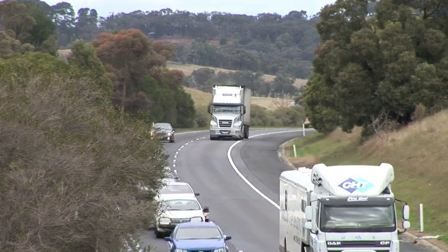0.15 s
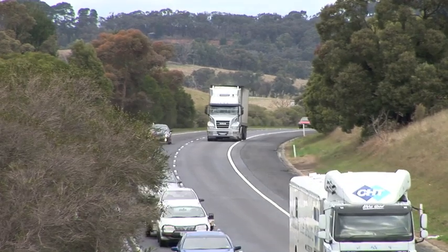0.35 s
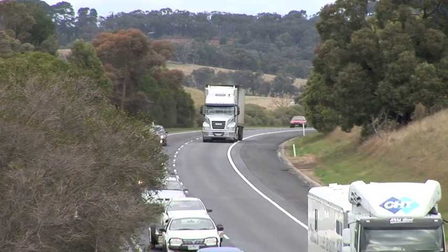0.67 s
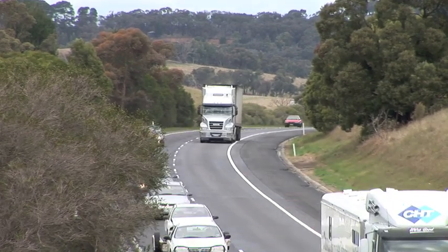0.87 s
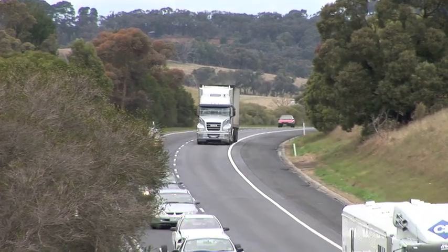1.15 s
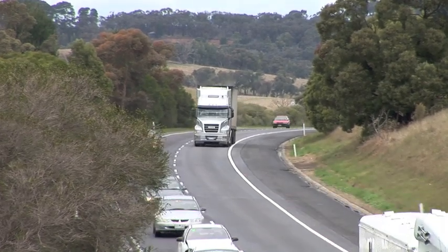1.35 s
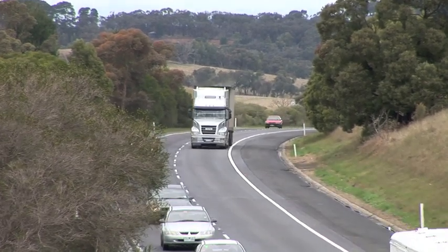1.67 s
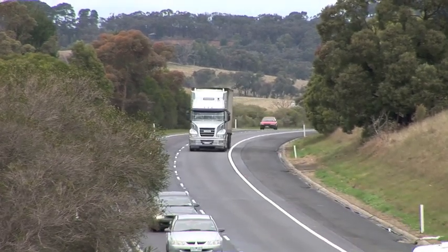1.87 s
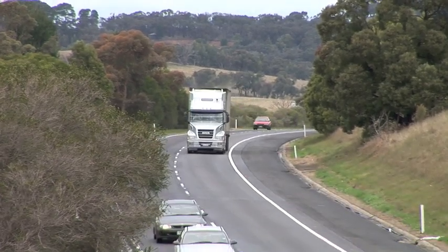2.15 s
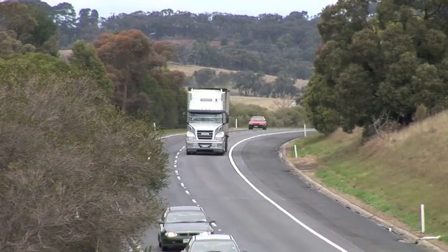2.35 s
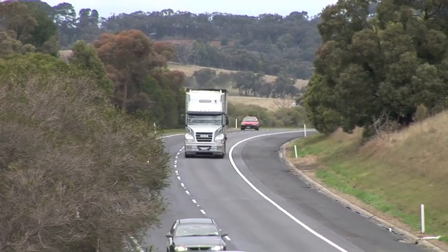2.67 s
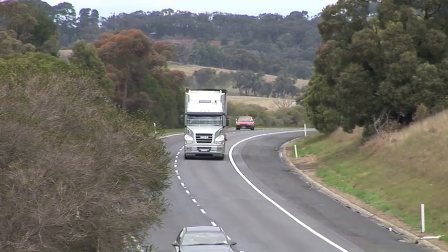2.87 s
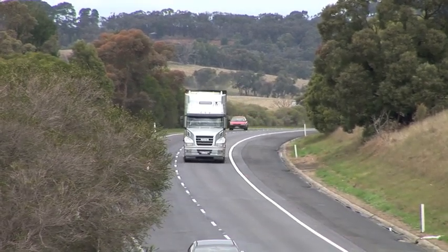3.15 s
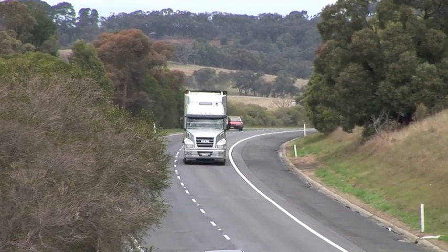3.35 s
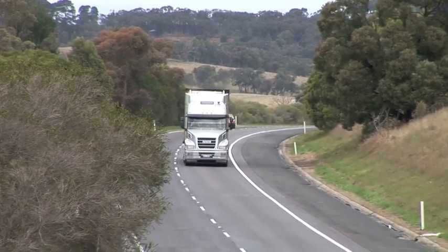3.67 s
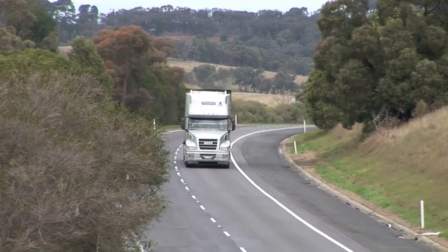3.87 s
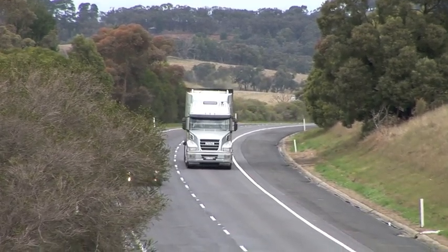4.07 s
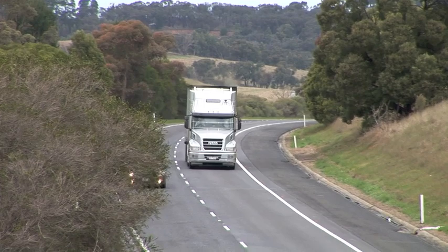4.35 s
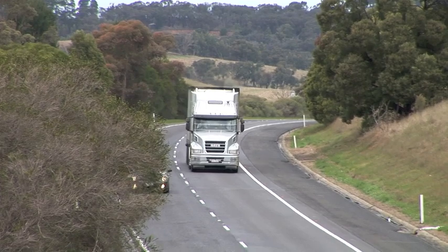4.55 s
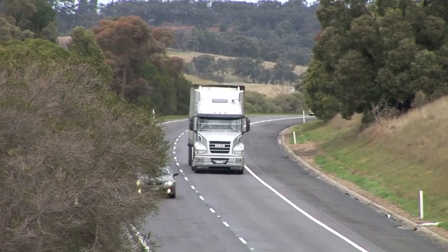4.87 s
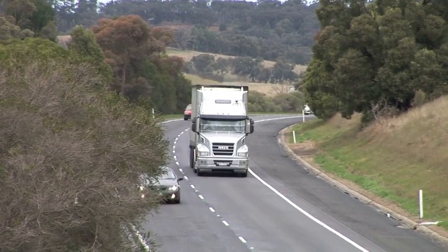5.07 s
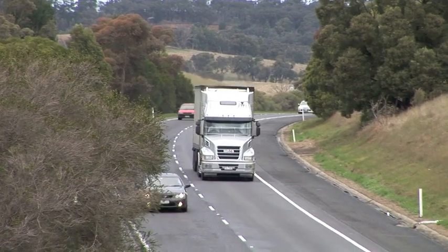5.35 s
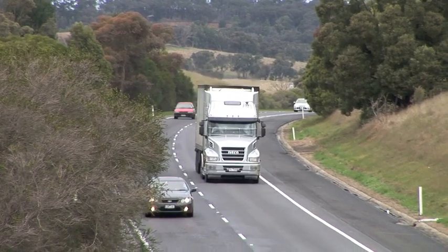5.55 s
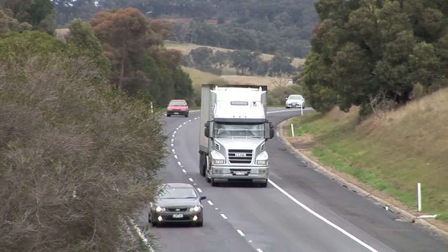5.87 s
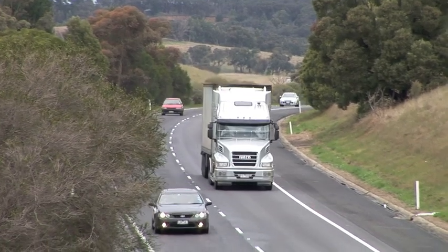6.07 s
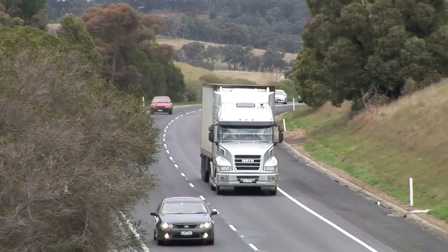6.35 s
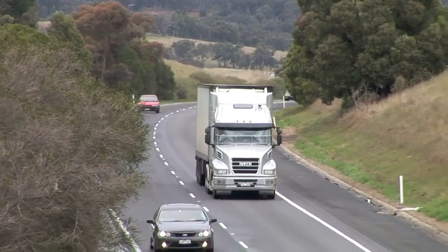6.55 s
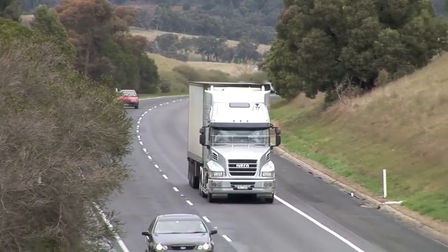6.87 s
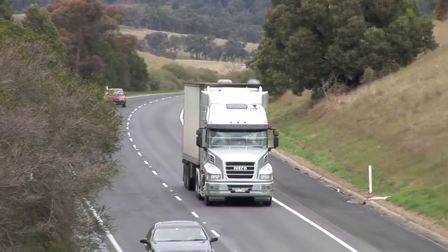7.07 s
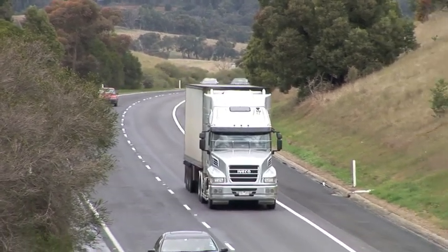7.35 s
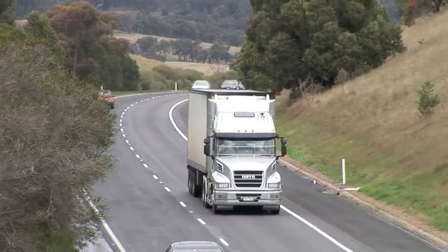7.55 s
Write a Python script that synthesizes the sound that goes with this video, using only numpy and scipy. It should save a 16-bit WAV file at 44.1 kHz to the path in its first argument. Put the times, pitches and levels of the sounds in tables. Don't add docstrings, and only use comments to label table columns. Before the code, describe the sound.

Continuous broadband tyre roar over faint distant traffic on an open country road. An early vehicle passes with a brief hollow bump, then a quieter stretch carries thin singing treads and a distant steady diesel. From four seconds everything swells: engines growl, tyres hiss brightly, and a truck drone surges and drops. Several passes overlap to the end, leaning right in a slightly compressed, hissy stereo pickup from a small camera.

```python
import sys
import numpy as np
from scipy import signal
from scipy.fft import rfft, irfft, next_fast_len
from scipy.io import wavfile
from scipy.ndimage import uniform_filter1d

SR = 44100
rng = np.random.default_rng(int(sys.argv[2]) if len(sys.argv) > 2 else 0)


def volts_from_decibels(level):
    exponent = np.asarray(level, float) / 20
    return 10 ** exponent


def digitize_waveform(pressure):
    field = np.atleast_2d(pressure).T
    bounded = np.clip(field, -1, 1)
    quanta = np.round(bounded * 32767).astype(np.int16)
    wavfile.write(sys.argv[1], SR, quanta)


N = 339481

# frequency in Hz, level in dB.
WHINE_LINES = [(6298, -98), (6600, -96), (6901, -97), (7348, -100), (7499, -102), (7650, -97), (7800, -104),
               (7951, -100), (8102, -102), (9152, -101), (10201, -102), (10352, -104), (10648, -102),
               (11251, -104)]
# start in seconds, level in dB.
JOLTS = [
    (1.5, -40),
    (1.567, -35.5),
    (1.65, -42),
]
# draws level in seconds, passage (lane distance / speed) in seconds,
# tyre level in dB, body level in dB, tread-groove level in dB.
VEHICLES = [
    (1.67, 0.76, -35, -33.5, -33.5),
    (2.51, 0.63, -57, -51.5, -51.5),
    (3.3, 0.097, -48, -47, -39.5),
    (4.93, .68, -30, -30, -25.5),
    (5.47, 0.55, -31, -32.5, -49),
    (5.93, 0.49, -32.5, -34, -30.5),
    (6.74, 0.52, -33, -35, -33),
    (7.42, 0.68, -33.5, -35.5, -30.5),
]
TYRE, BODY, GROOVE = 2, 3, 4

# frequency in Hz, density in dB per Hz.
WAKE_COLOUR = [(12, -42.5), (22, -19), (48, -6.5), (65, -3), (95, 0), (125, -3.5), (160, -44)]
# draws level in seconds, passage in seconds, firing rate in Hz, speed in m/s, level in dB.
CARS = [
    (1.8, .25, 55, 22, -45),
    (1.95, 0.16, 82, 4.4, -45.5),
    (5.1, .45, 75.6, 24, -35),
    (5.0, .8, 67, 28, -44),
]
# time in seconds, firing rate in Hz, level in dB, second-order level in dB.
DIESEL = [(.3, 112, -49, -70), (.7, 112, -52, -81), (1.5, 111, -47.5, -68), (2.0, 111.5, -51, -71),
          (2.3, 112.8, -44, -68), (2.9, 112, -45, -65.5), (4.0, 112.1, -37, -57),
          (5.05, 111.9, -30.5, -52.5), (5.29, 110.5, -23, -60), (5.48, 109.7, -26.5, -44),
          (5.7, 107, -26, -48), (5.9, 100.6, -29, -55), (6.1, 101.3, -26.5, -41.5), (6.29, 100, -33.5, -53),
          (6.52, 95.8, -41, -65), (7.0, 94.9, -42.5, -59), (7.22, 95.7, -37.5, -64.5), (7.65, 94, -48, -65)]
# time in seconds, firing rate in Hz, level in dB.
SECOND_DIESEL = [(4.55, 115.5, -48), (4.8, 115.5, -46), (5.15, 115.1, -45), (5.45, 113.2, -47),
                 (5.72, 110.6, -42), (6.05, 108.3, -51), (6.2, 108.1, -42), (6.42, 108.6, -48),
                 (7.0, 107.5, -50)]
# time in seconds, depth in dB, half length in seconds.
CANCELS = [
    (5.173, 1.5, .06),
    (5.817, 11, 0.068),
    (6.077, 14, 0.044),
    (6.207, 21, 0.063),
    (6.412, 17, 0.086),
    (6.703, 7, 0.13),
    (7.35, 8.5, 0.096),
]
# time in seconds, order, lift in dB, half length in seconds.
FLARES = [
    (4.8, 2, 10, .15),
    (5.123, 2, 18.5, 0.24),
    (5.36, 2, 18, .22),
    (5.254, 3, 15, 0.43),
    (5.74, 3, 13, .16),
    (6.417, 2, 18.5, 0.12),
]

# low edge in Hz, high edge in Hz.
ROAR_BANDS = [(1450, 3200), (130, 320), (380, 700), (750, 980)]
# frequency in Hz, density in dB per Hz.
ROAR_COLOUR = [(120, -6), (229, -11.5), (332, -11.5), (452, -12.5), (644, -12), (800, -9.5), (980, -9),
               (1060, -22), (1300, -17.5), (1450, -12.5), (2130, -12.5), (2850, -17.5), (3300, -24),
               (3700, -43.5)]
GROOVE_COLOUR = [(930, -19), (1020, 1), (1100, 2), (1250, 0.5), (1350, -2.5), (1480, -23.5)]
GRIT_COLOUR = [(3000, -25.5), (3350, -1), (4000, -4.5), (4500, -15), (4950, -9), (5300, -17), (5750, -19.5),
               (6200, -24), (7000, -29.5), (8000, -38), (8600, -27), (9350, -34.5), (10300, -33),
               (15200, -37)]
# time in seconds, frequency in Hz, level in dB.
TREAD_LOW = [(2.5, 555, -66), (2.9, 554, -55), (3.3, 553, -52), (3.95, 552, -51), (4.15, 551, -60),
             (4.5, 548, -55), (4.9, 543, -58)]
TREAD_HIGH = [(2.3, 1113, -60), (2.65, 1112, -47.5), (3.1, 1110, -48), (3.6, 1106, -48), (4.2, 1098, -46),
              (4.7, 1087, -43), (5.1, 1075, -52)]
GEAR = [(2.5, 380, -63), (3.4, 380, -59), (4.0, 378, -49.5), (4.3, 377, -64), (4.6, 375, -43.5),
        (4.9, 370, -56)]
EARLY_TREAD = [(0, 803, -52), (.8, 803, -50), (1.1, 812, -52), (1.3, 822, -56)]

# frequency in Hz, gain in dB, phase in radians.
CAPSULE = [(172, -53.7, -0.38), (258, -28.5, -0.82), (344, -17.0, -1.04), (516, -8.8, -1.52),
           (689, -6.5, -1.89), (947, -7.3, -2.18), (1205, -8.0, -2.52), (1464, -8.0, -2.81),
           (1808, -11.0, -3.28), (2153, -15.5, -3.24), (2670, -22.1, -2.49), (3445, -22.4, -1.28),
           (4306, -7.4, -1.22), (4823, -13.9, -1.88)]
# frequency in Hz, density in dB per Hz.
SCATTER_COLOUR = [(76, -70), (130, -23), (192, -12.5), (325, -14), (525, -12.5), (585, -12), (786, -5.5),
                  (1070, -3.5), (1680, -7.5), (3230, -26.5), (4010, -25), (5060, -31.5), (5300, -40.5),
                  (6890, -60), (11700, -120)]
SCATTER_HISS_COLOUR = [(3120, -34), (5300, -4), (5610, 0), (6020, -1), (6430, -4), (7310, -17), (9040, -15),
                       (10700, -22), (13600, -19), (14400, -22), (15200, -29)]
BAND_STARTS = np.r_[0:40:4, 40:96:8, 96:144:12, 144, 160, 176, 196, 216, 240, 264, 292, 320:1025:32]

# level against vehicle in dB, fall as power of nearness,
# share heard from all round (0-1), far-traffic level in dB.
HISS, BOOM = (0.2, 2, 0.2855, -45), (-10.5, 1.24, .78, -57.5)
DIP, TREAD = (-12, 1.5, 0.48, -66.5), (-3.5, 2, 0.3955, -51)
SIZZLE, RING = (-15.5, 1.8, 0.2457, -62.5), (-5.5, 1.5, 0.48, -49)
PUSH, SPRAY = (-18, 4.5, 0.78, -59), (-34.5, 4.6, .5, -89)
FILL, THUMP = (-8.5, 8.5, 0.73, -91.5), (-12, 4.5, 0.45, -90)
SCATTER_ROAR, SCATTER_HISS = (-7.5, 3, 0.77, -51), (-22, 3.5, 0.51, -75.5)


def walk(rate_hz):
    hold = int(SR / rate_hz)
    steps = np.repeat(rng.standard_normal(N // hold + 1), hold)
    return 1.284 * uniform_filter1d(uniform_filter1d(steps, hold), hold)[:N]


def columns(table):
    time_s, *rest = np.transpose(table)
    return [np.interp(np.arange(N) / SR, time_s, values) for values in rest]


def on_log(hz, table, column=1):
    table = np.array(table)
    return np.interp(np.log(hz), np.log(table[:, 0]), table[:, column])


def spectrum_axis():
    size = next_fast_len(N)
    return size, np.arange(1, size // 2 + 2) * SR / size


def both(a_db, b_db):
    return 10 * np.log10(volts_from_decibels(a_db) ** 2 + volts_from_decibels(b_db) ** 2)


def moment(centre_s, half_s):
    return np.clip(1 - abs(np.arange(N) / SR - centre_s) / half_s, 0, 1)


def noise(colour, bands, levels_db, swell_db, flicker_db, count):
    size, hz = spectrum_axis()
    shape = volts_from_decibels(on_log(hz, colour)) * (hz > colour[0][0]) * (hz < colour[-1][0])
    spectrum = rfft(rng.standard_normal(size)) * shape
    own_db = [10 * np.log10(2 * np.sum(shape[(hz > lo) & (hz < hi)] ** 2) / size) for lo, hi in bands]
    order = np.argsort([lo for lo, hi in bands])
    edges = np.log(np.array(bands)[order] * [1.12, .88]).ravel()
    centres = np.linspace(np.log(colour[0][0]), np.log(colour[-1][0]), count)
    out = 0
    for k, centre in enumerate(centres):
        shares = [np.interp(centre, edges, np.repeat(order == b, 2)) for b in range(len(bands))]
        gain_db = sum(share * (level - own) for share, level, own in zip(shares, levels_db, own_db))
        slice_shape = np.interp(np.log(hz), centres, np.arange(count) == k)
        piece = irfft(spectrum * slice_shape, size)[:N]
        out = out + piece * volts_from_decibels(gain_db + swell_db * walk(3.14) + flicker_db * walk(14))
    return out


def tone(table, drift, flutter_db, rate_hz):
    hz, *levels_db = columns(table)
    t = np.arange(N) / SR
    span = np.clip(np.minimum(t - table[0][0] + .02, table[-1][0] - t) / .12, 0, 1)
    phase = 2 * np.pi * np.cumsum(hz * (1 + drift * walk(rate_hz))) / SR
    out = 0
    for order, db in enumerate(levels_db, 1):
        out = out + np.sqrt(2) * volts_from_decibels(db + flutter_db * walk(rate_hz)) * np.sin(order * phase)
    return span * out


def bearing(level_s, passage_s):
    along = (np.arange(N) / SR - level_s) / passage_s
    return -along / np.hypot(1, along), 1 / np.hypot(1, along)


def heard(path, column):
    own_db, fall, all_round, far_db = path
    power = volts_from_decibels(far_db) ** 2
    for row in VEHICLES:
        ahead, near = bearing(*row[:2])
        pickup = all_round + (1 - all_round) * ahead
        power = power + (volts_from_decibels(row[column] + own_db) * near ** fall * pickup) ** 2
    return 10 * np.log10(power)


def camera():
    t = np.arange(N) / SR
    whine = sum(np.sqrt(2) * volts_from_decibels(db) * np.sin(2 * np.pi * (hz * t + rng.random())) for hz, db in WHINE_LINES)
    return whine + volts_from_decibels(-74.5) * rng.standard_normal((2, N))


def jolts():
    t = np.arange(N) / SR
    panels = signal.butter(2, [470, 900], "band", fs=SR, output="sos")
    rattle = signal.sosfilt(panels, rng.standard_normal(N))
    age = np.array([np.clip(t - start_s, 0, 1) / .014 for start_s, db in JOLTS])
    swell = np.e * age * np.exp(-age)
    return rattle / rattle.std() * (volts_from_decibels(np.array(JOLTS)[:, 1]) @ swell)


def wake():
    return noise(WAKE_COLOUR, [(25, 62)], [heard(PUSH, BODY)], swell_db=1.2, flicker_db=.3, count=4)


def car(level_s, passage_s, firing_hz, speed_m_s, db):
    fall, all_round = 1.32, 0.66
    ahead, near = bearing(level_s, passage_s)
    gain = near ** fall * (all_round + (1 - all_round) * ahead)
    heard_hz = firing_hz / (1 - ahead * speed_m_s / 343)
    return np.transpose([np.arange(N) / SR, heard_hz, db + 20 * np.log10(gain)])


def echoed(table, changes_db):
    t = np.arange(N) / SR
    hz, *levels_db = columns(table)
    inside = (t >= table[0][0]) & (t <= table[-1][0])
    changed_db = [db + change for db, change in zip(levels_db, changes_db)]
    return np.transpose([t, hz] + changed_db)[inside]


def diesels():
    cancel_db = sum(db * moment(centre_s, half_s) for centre_s, db, half_s in CANCELS)
    lifts_db = [sum(db * moment(centre_s, half_s) for centre_s, k, db, half_s in FLARES if round(k) == order)
                for order in (1, 2, 3)]
    second = [(s, hz, db, db - 11.5, db - 12) for s, hz, db in SECOND_DIESEL]
    first_drone = tone(echoed(DIESEL, [-cancel_db, 0]), .003, 0.7, 9)
    return first_drone + tone(echoed(second, lifts_db), .003, .8, 9)


def engines():
    return diesels() + sum(tone(car(*row), 0.0049, 1.1, 14) for row in CARS)


def songs():
    steady = sum(volts_from_decibels(-2) * tone(table, .0018, 1.6, 18) for table in (TREAD_LOW, TREAD_HIGH, GEAR))
    return steady + volts_from_decibels(-1) * tone(EARLY_TREAD, .016, 3, 45)


def tyres():
    boom_db = both(heard(BOOM, TYRE), heard(THUMP, BODY))
    dip_db = both(heard(DIP, TYRE), heard(FILL, TYRE))
    roar_db = [heard(HISS, TYRE), boom_db, dip_db, heard(TREAD, TYRE)]
    roar = noise(ROAR_COLOUR, ROAR_BANDS, roar_db, swell_db=0.62, flicker_db=.5, count=17)
    groove = noise(GROOVE_COLOUR, [(1020, 1350)], [heard(RING, GROOVE)], swell_db=.6, flicker_db=.5, count=4)
    grit_db = [heard(SIZZLE, TYRE), heard(SPRAY, BODY)]
    grit = noise(GRIT_COLOUR, [(3400, 5600), (9700, 14500)], grit_db, swell_db=.5, flicker_db=1.2, count=8)
    return roar + groove + grit + songs()


def rightness():
    side_gain, front_round, far_db, far_left = 1.22, 0.35, -53, .32
    shared, forward = 0, volts_from_decibels(far_db) ** 2
    for row in VEHICLES:
        ahead, near = bearing(*row[:2])
        body = volts_from_decibels(row[BODY])
        front = body * near * (front_round + (1 - front_round) * ahead)
        shared = shared + front * body * near ** 2
        forward = forward + front ** 2
    return side_gain * shared / forward - far_left


def sideways(front):
    size, hz = spectrum_axis()
    answer = volts_from_decibels(on_log(hz, CAPSULE)) * np.exp(1j * on_log(hz, CAPSULE, column=2))
    direct = rightness() * irfft(rfft(front, size) * answer, size)[:N]
    roar = noise(SCATTER_COLOUR, [(450, 2200)], [heard(SCATTER_ROAR, BODY)],
                 swell_db=1.64, flicker_db=1.5, count=12)
    hiss = noise(SCATTER_HISS_COLOUR, [(5400, 9500)], [heard(SCATTER_HISS, BODY)],
                 swell_db=.4, flicker_db=.5, count=5)
    return direct + roar + hiss


def scene():
    front = jolts() + wake() + engines() + tyres()
    side = sideways(front)
    return np.array([front + side, front - side]) + camera()


def masked(dry, mid_db, side_db, loud_db, slope, waver_db):
    pair = np.array([dry[0] + dry[1], dry[0] - dry[1]]) / 2
    lead, frame = 1024 - 655, 2048
    shape = dict(window=np.sin(np.pi * (np.arange(frame) + .5) / frame), nperseg=frame)
    cells = signal.stft(np.pad(pair, ((0, 0), (lead, 0))), **shape)[2]
    power = abs(cells) ** 2 + 1e-20
    width = np.diff(np.r_[BAND_STARTS, 1025])[:, None]
    mean = np.add.reduceat(power, BAND_STARTS, axis=1) / width
    treble_db = 10 * np.log10(uniform_filter1d(power[1, 250:440].sum(axis=0), size=9))
    loud = slope * np.minimum(9, treble_db - loud_db)
    step_db = np.array([mid_db + loud, side_db + 0 * loud])[:, None] + waver_db * rng.standard_normal(mean.shape)
    step = uniform_filter1d(mean[::-1], size=3) * volts_from_decibels(2 * step_db)
    step[0, BAND_STARTS < 292] *= .07
    step[0, BAND_STARTS >= 448] *= .3
    step[0, BAND_STARTS < 240] = 0
    step[:, BAND_STARTS >= 672] += step_db[0, BAND_STARTS >= 672] < mid_db + 2.5
    step[:, BAND_STARTS > 672] = 1
    band = np.searchsorted(BAND_STARTS, np.arange(frame // 2 + 1), side="right") - 1
    kept = cells * (power > step[:, band])
    mid, side = signal.istft(kept, **shape)[1][:, lead:lead + N]
    return np.array([mid + side, mid - side])


def top_cut(x):
    return signal.sosfilt(signal.butter(12, 15460, fs=SR, output="sos"), x)


def record(dry):
    mix = masked(dry, mid_db=-.5, side_db=-14, loud_db=-71.5, slope=.4, waver_db=1.1)
    return top_cut(mix)


dry = scene()
out = record(dry)
digitize_waveform(out)
```